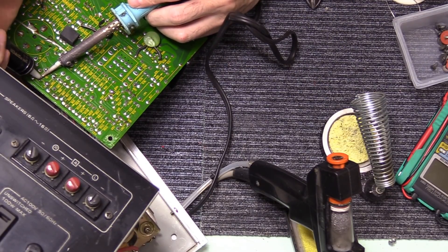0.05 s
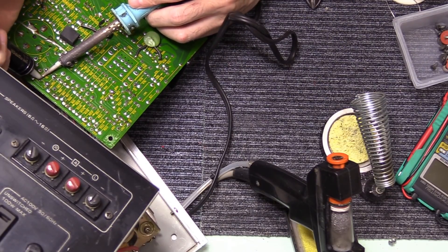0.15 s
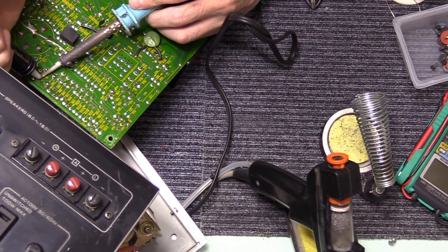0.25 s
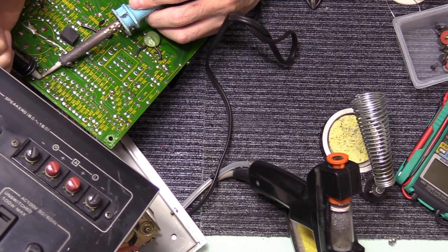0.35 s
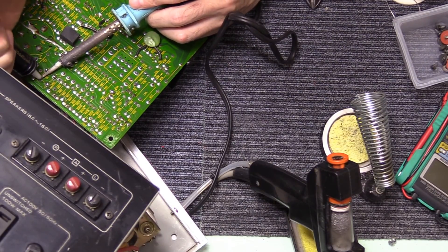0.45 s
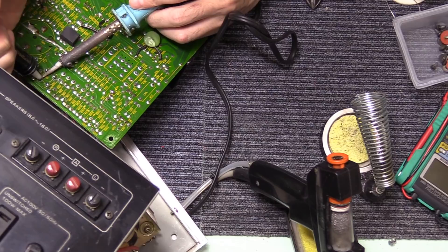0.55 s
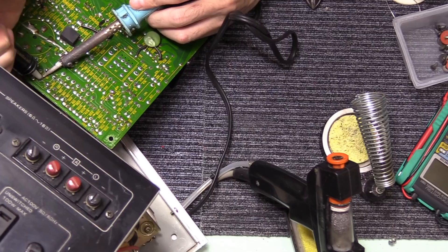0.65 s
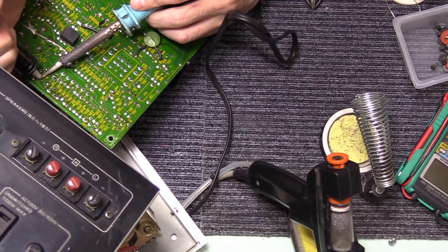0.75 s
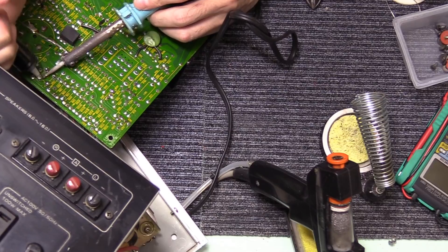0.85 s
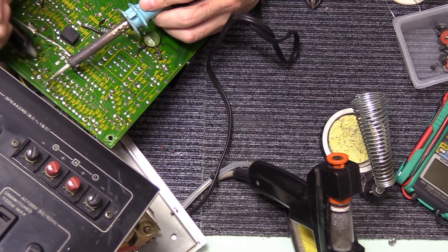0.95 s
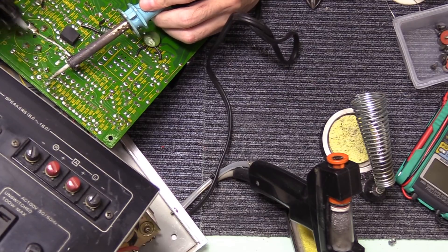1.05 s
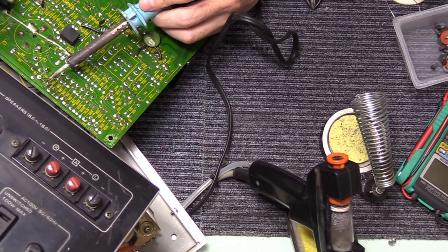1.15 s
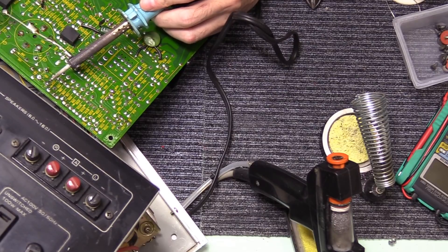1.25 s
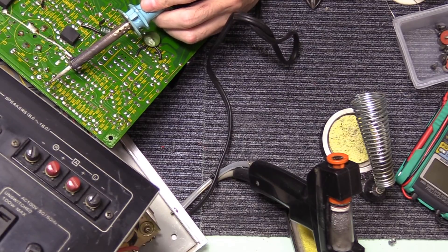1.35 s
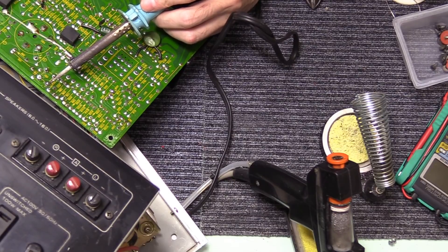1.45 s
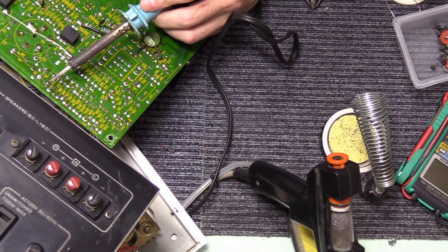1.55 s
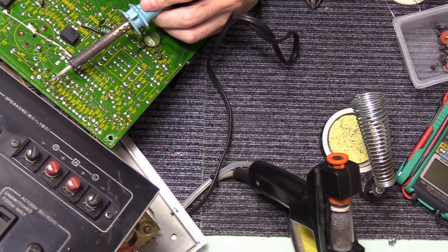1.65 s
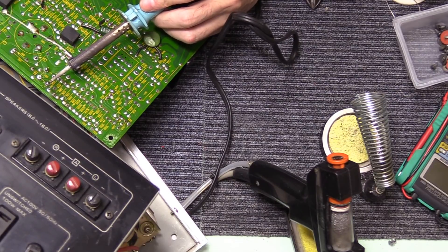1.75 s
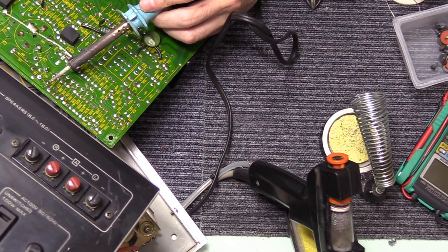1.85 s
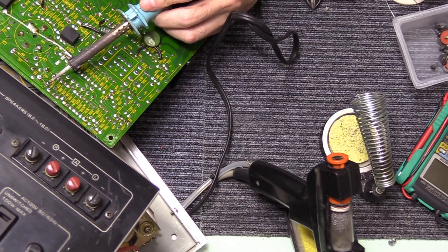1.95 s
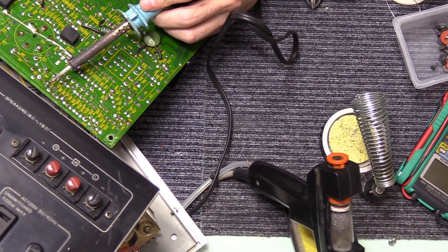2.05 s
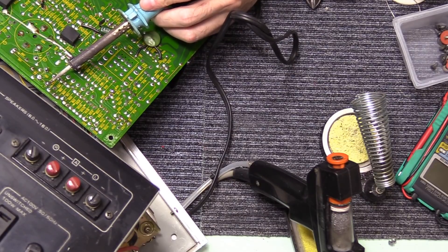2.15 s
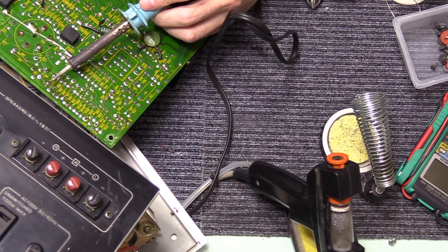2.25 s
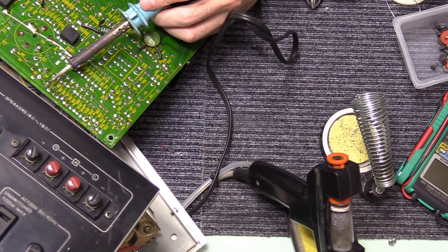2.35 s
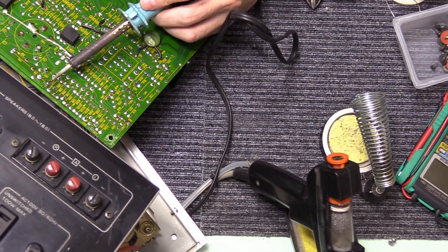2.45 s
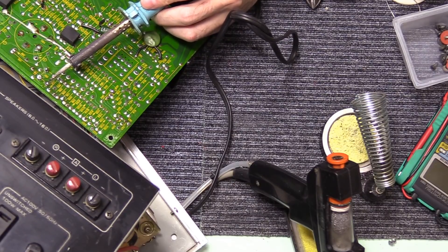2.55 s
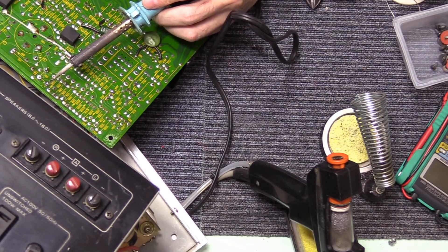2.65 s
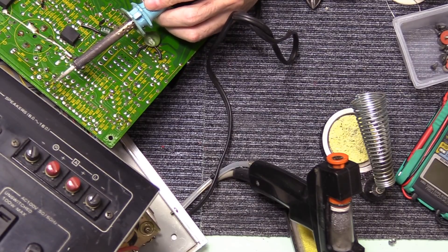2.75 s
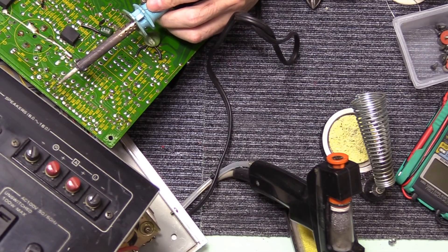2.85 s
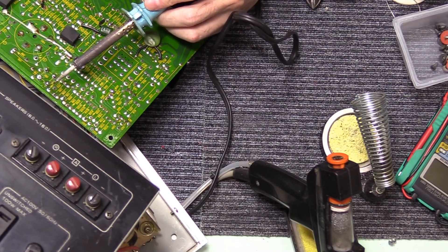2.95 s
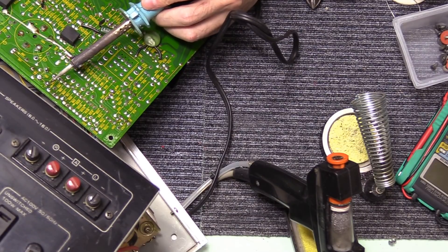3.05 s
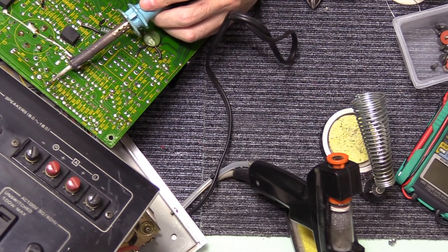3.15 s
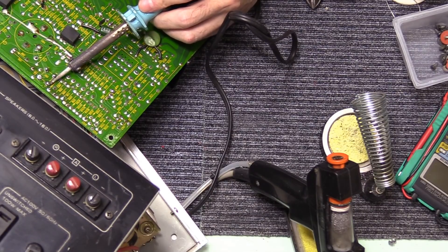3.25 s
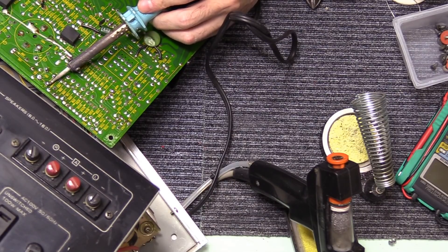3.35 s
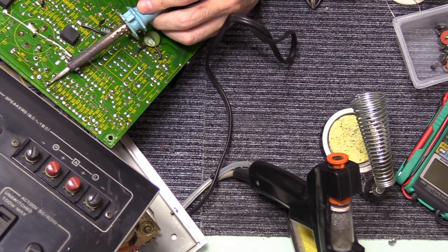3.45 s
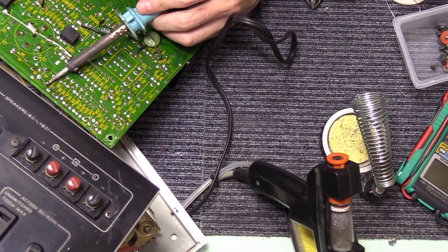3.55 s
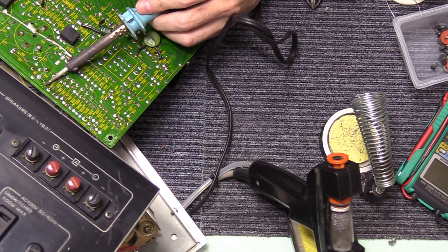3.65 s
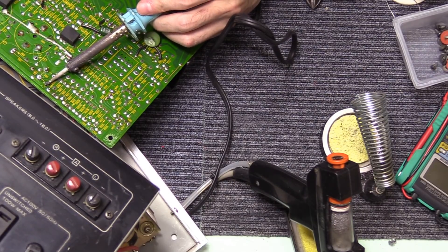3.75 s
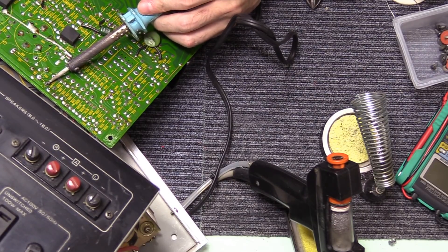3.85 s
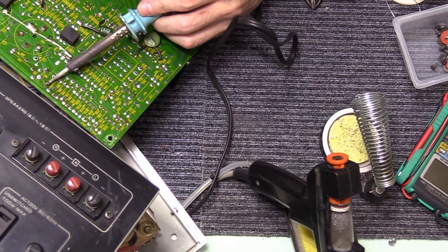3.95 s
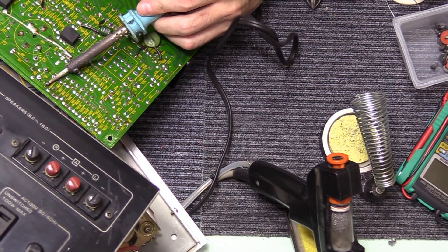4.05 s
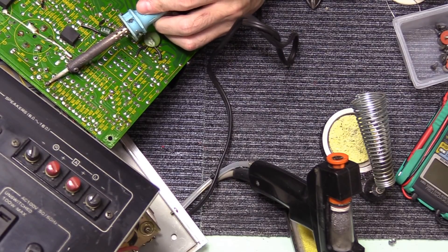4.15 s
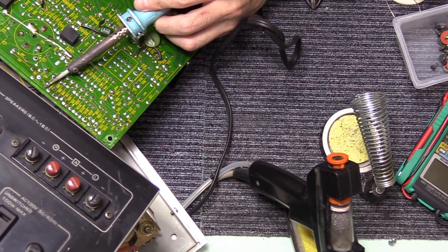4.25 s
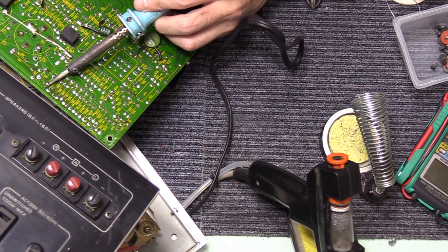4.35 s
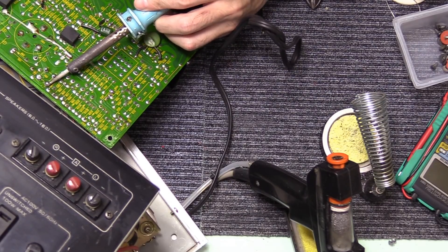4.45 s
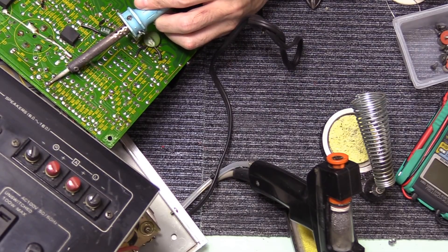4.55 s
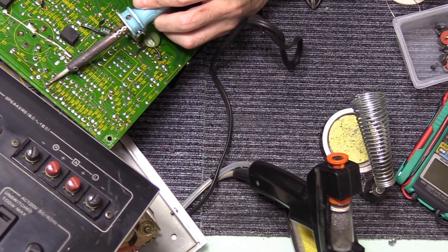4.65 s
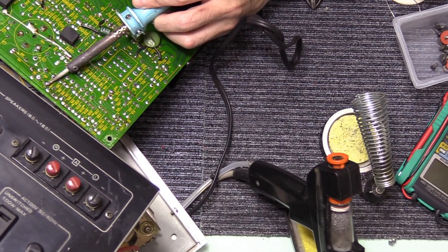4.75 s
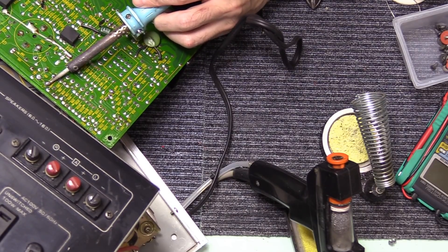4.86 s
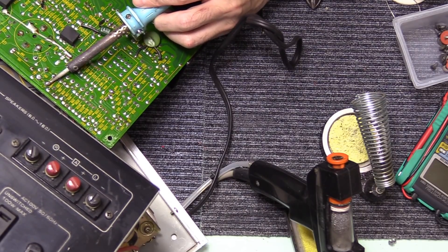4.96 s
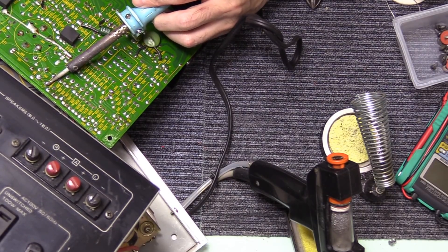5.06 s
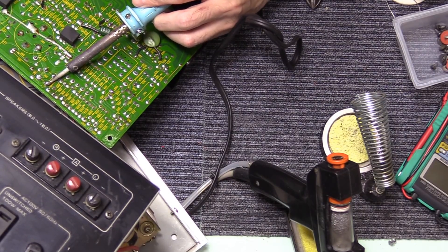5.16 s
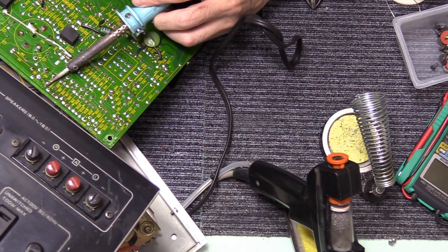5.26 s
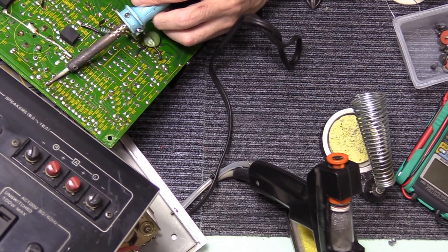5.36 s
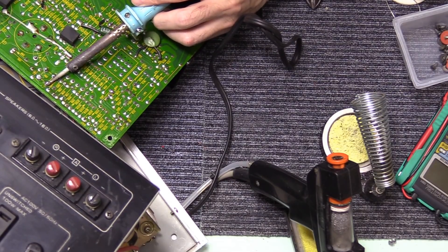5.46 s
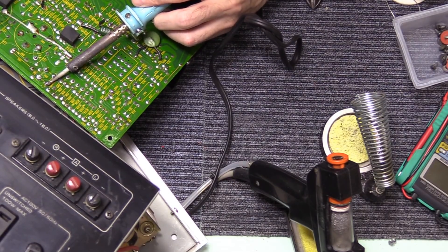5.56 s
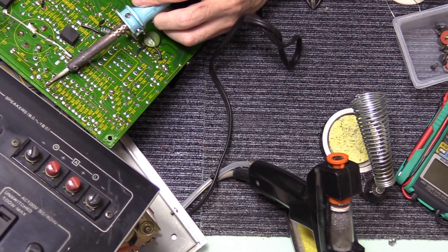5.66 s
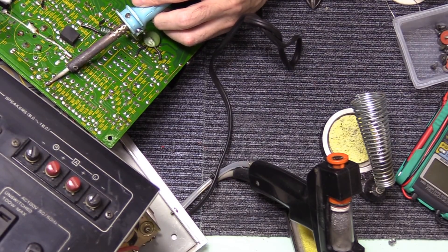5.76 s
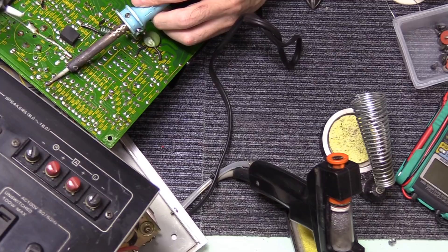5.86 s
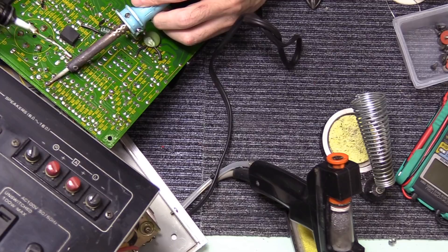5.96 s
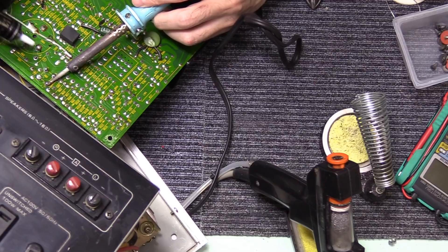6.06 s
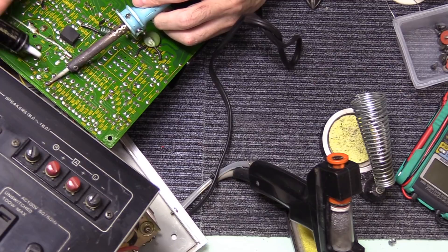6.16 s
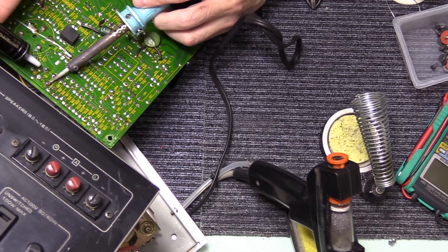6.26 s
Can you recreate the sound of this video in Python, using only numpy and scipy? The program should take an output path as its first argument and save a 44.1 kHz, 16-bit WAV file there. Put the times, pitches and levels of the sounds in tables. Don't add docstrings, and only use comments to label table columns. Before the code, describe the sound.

Quiet fan air and low electrical hum run throughout. Early on, a spring plunger snaps loose, slams on its stop and rattles in its hollow barrel, making the bench thump. Less than two seconds later, a breathy sliding hiss ends in a bright metallic click and a weaker knob click. Sparse ticks and faint rubs continue, with a light board tap near the end. Close stereo microphone, short dull room echo.

```python
import sys
import numpy as np
from scipy import signal
from scipy.fft import rfft, irfft
from scipy.io import wavfile
from scipy.ndimage import uniform_filter1d

SR = 44100
rng = np.random.default_rng(int(sys.argv[2]) if len(sys.argv) > 2 else 0)


def to_wav(sig):
    pcm = np.clip(np.atleast_2d(sig), -1, 1) * 32767
    pcm = np.round(pcm).astype(np.int16)
    wavfile.write(sys.argv[1], SR, pcm.T)


def rack_gain(trim_db):
    fader = np.asarray(trim_db, float)
    return 10 ** (fader / 20)


N = 278737


def span(seconds):
    return np.arange(int(seconds * SR)) / SR


def sine(hz, t):
    return np.sin(2 * np.pi * hz * t)


def fade(t, t60_s):
    return np.exp(-np.log(1000) * t / t60_s)


def unit(x):
    return x / np.sqrt(np.mean(x ** 2))


def band(x, hz, width_hz, order=1):
    low_hz = np.sqrt(hz ** 2 + width_hz ** 2 / 4) - width_hz / 2
    high_hz = min(low_hz + width_hz, SR / 2.2)
    sos = signal.butter(order, [low_hz, high_hz], "bandpass", fs=SR, output="sos")
    return signal.sosfilt(sos, x)


def add(out, start_s, x, pan_db=0):
    i = int(start_s * SR)
    x = x[:N - i]
    out[:, i:i + len(x)] += x * rack_gain(np.array([[pan_db], [-pan_db]]) / 2)


def colour(table):
    hz, db = np.transpose(table)
    bin_hz = np.fft.rfftfreq(N, 1 / SR)
    return rack_gain(np.interp(np.log(bin_hz + 1), np.log(hz), db))


def rattle(contact_ms):
    t = span(.05)
    return rng.standard_normal(len(t)) * np.exp(-1000 * t / contact_ms) / 2


def cluster_ring(hz, t60_s, cluster, t):
    spread = .035 * np.sqrt(hz / 5000)
    beat = sum(np.sin(2 * np.pi * hz * (1 + spread * off) * t + np.pi * turn) for off, turn in cluster)
    return beat / np.abs(beat[:SR // 200]).max() * fade(t, t60_s)


def blows(out, table, modes):
    t = span(.25)
    for start_s, ring_db, crack_db, crack_hz, contact_ms, pan_db in table:
        push = rattle(contact_ms)
        onset = np.minimum(2000 * t / contact_ms, 1)
        chance = rng.uniform(-0.93, 1, (len(modes), 5, 2))
        for (hz, db, t60_s), cluster in zip(modes, chance):
            ring = cluster_ring(hz, t60_s, cluster, t) * onset
            add(out, start_s, rack_gain(ring_db + db + 4) * ring, pan_db + 3 * cluster[0, 0])
        crack = 2 * band(push, crack_hz, 1.1 * crack_hz)
        add(out, start_s, rack_gain(crack_db) * crack, pan_db)


# (frequency [Hz], density [dB per Hz])
AIR_COLOUR = [(15, -40.5), (30, -26.5), (65, -25), (90, -12.5), (120, -6), (160, -15), (200, -9), (350, -7),
              (430, -13), (900, -16.5), (1300, -21.5), (2000, -27.5), (6000, -33), (15600, -41)]
# (frequency [Hz], side minus mid [dB])
AIR_SIDE = [(60, -17.5), (110, -9), (200, -14.5), (380, -11.5), (700, -6), (1290, -3.5), (2380, -3.5),
            (4400, -7), (8120, -6.5), (15000, -4)]
# (frequency [Hz], level [dB], waver width [Hz], waver level [dB])
HUM_LINES = [(99.488, -64, 2, -74.5), (118.62, -67.5, 5.9, -66), (200, -66, 5.1, -66.5),
             (382.63, -63, 2.2, -68.5), (895.52, -76.5, 20, -72), (2331.4, -83.5, 30, -79.5)]


def air():
    mid, side = rfft(rng.standard_normal((2, N))) * colour(AIR_COLOUR)
    mid, side = irfft(mid, N), irfft(side * colour(AIR_SIDE), N)
    swell = rack_gain(.5 * unit(uniform_filter1d(rng.standard_normal(N), size=8192)))
    air_db = -52.5
    bed = rack_gain(air_db - 2.5) * swell * np.array([mid + side, mid - side]) / np.std(mid)
    t = np.arange(N) / SR
    for hz, db, width_hz, waver_db in HUM_LINES:
        waver = unit(band(rng.standard_normal(N), hz, width_hz))
        bed += rack_gain(db + 2.5) * sine(hz, t) + rack_gain(waver_db) * waver
    shaft_hz, shaft_db, throb_s, throb_top_s = 48.9, -66.5, 2.56, 2.4
    throb = np.cos(np.pi * (t - throb_top_s) / throb_s)
    return bed + rack_gain(shaft_db) * throb * sine(shaft_hz, t)


# (time [s], ring peak [dB], ring frequency [Hz], low [dB], middle [dB], high [dB])
TOOL_TICKS = [(0.129, -54, 869.7, -52.5, -51, -52.5), (0.411, -46, 716.2, -51, -53.5, -63.5),
              (0.545, -46.5, 847.8, -43, -46.5, -52), (0.816, -46, 617.1, -47, -45.5, -43.5),
              (1.314, -34.5, 3499, -59.5, -54, -56), (1.49, -32.5, 2892, -59, -54.5, -48.5),
              (1.529, -50, 603.8, -54.5, -61.5, -45.5), (1.551, -36, 9051, -56.5, -61, -44),
              (1.586, -41.5, 1298, -50.5, -61, -63), (1.769, -54.5, 880.8, -54.5, -53, -62),
              (2.062, -47, 612.3, -57.5, -50, -46), (2.089, -49, 778, -60.5, -52.5, -72.5),
              (2.499, -51, 594.3, -59, -56.5, -63), (2.52, -53.5, 690.4, -59.5, -51, -50),
              (2.673, -57.5, 840, -58, -51.5, -54.5), (2.747, -47.5, 887, -68, -53, -46.5),
              (3.308, -32, 665.5, -44, -45, -56), (3.71, -50, 940, -59, -56, -54.5),
              (3.742, -55, 770, -54, -64, -47.5), (3.769, -55.5, 894, -58, -68, -54),
              (3.799, -54.5, 901.8, -59, -61, -61), (3.954, -46.5, 770, -56, -60, -69.5),
              (4.263, -49, 891, -50.5, -49, -49.5), (4.308, -40.5, 643, -54, -61, -67),
              (4.524, -54.5, 775, -59, -58, -68.5), (4.61, -42, 770, -51, -51, -55),
              (4.688, -32.5, 1062, -47.5, -44.5, -49), (4.705, -43, 1160, -58, -50, -70.5),
              (4.919, -58.5, 627, -56, -65.5, -69.5), (5.881, -45, 711, -66, -58, -51.5),
              (6.0, -45, 715.9, -58.5, -57, -66), (6.089, -52.5, 794, -46, -45, -45.5),
              (6.147, -52, 652, -54, -51.5, -73), (6.192, -50, 939, -48.5, -51.5, -62)]


def ticks(out):
    for start_s, ring_db, ring_hz, low_db, middle_db, high_db in TOOL_TICKS:
        push = rattle(4.0)
        for hz, width_hz, part_db in ((1100, 1800, low_db), (3500, 5200, middle_db), (9700, 7500, high_db)):
            part = band(push, hz, width_hz, order=2)
            add(out, start_s, rack_gain(part_db + 5.5) * part / np.abs(part).max())
        ring = band(push, ring_hz, 0.077 * ring_hz)
        add(out, start_s, rack_gain(ring_db - 5.5) * ring / np.abs(ring).max())


def room(x):
    low_t60_s, top_t60_s, room_db, side_db = 0.16809, 0.14, -6.5, -9.5
    t = span(.4)
    noise = rng.standard_normal((2, len(t)))
    low = band(noise, 700, 3200)
    mid, side = low * fade(t, low_t60_s) + (noise - low) * fade(t, top_t60_s)
    side = rack_gain(side_db) * side
    echo = np.array([mid + side, mid - side]) * (t > .0025)
    return rack_gain(room_db) * signal.fftconvolve(x, echo / np.linalg.norm(mid), axes=1)[:, :N]


RELEASE_BLOWS = [
    (.6245, -19, -14, 6000, 15.05, 0.01377),
    (.6275, -21, -19.5, 4000, 4.6, 0),
]
SPRING_MODES = [(322.78, -4, 0.03634), (696, 3, 0.036), (1080.1, 1.5, 0.039), (1411.8, -15.5, 0.05446),
                (4480.1, -12.5, 0.01888), (7000, -12.5, .02)]


def release(out):
    blows(out, RELEASE_BLOWS, SPRING_MODES)


# (time [s], frequency [Hz], level [dB], rise [ms], t60 [s])
BENCH_BOOMS = [
    (.636, 118, -19, 15, .3),
    (.634, 86, -31, 12, 0.3),
    (.625, 45, -44, 10, .25),
    (.64, 175, -38, 12, 0.298),
    (.626, 210, -34, 4, .1),
    (2.8, 91, -57.5, 15, 0.3297),
    (4.26, 110, -50.5, 20, 0.374),
]


def bench(out):
    t = span(.6)
    for start_s, hz, db, rise_ms, t60_s in BENCH_BOOMS:
        rise = 1 - np.exp(-(1000 * t / rise_ms) ** 2)
        add(out, start_s, rack_gain(db) * rise * fade(t, t60_s) * sine(hz, t))


SLAM_BLOWS = [
    (.634, -12, -0.5, 8250, 1.6, -3),
]
STOP_MODES = [(324.94, -12, .03), (1397.1, -7, .025), (1851.1, 0.5, .025), (2150, -4, .02),
              (5661, -6, .012), (8332.3, -1.5, 0.016), (10723, -7, .012)]


def slam(out):
    blows(out, SLAM_BLOWS, STOP_MODES)


CLATTER_BLOWS = [
    (.637, -22, -16, 5000, 4, 0.9994),
    (.642, -21, -17, 6000, 5, 0.0034),
    (.648, -24, -18, 7000, 5, 0),
    (.655, -24, -18, 5000, 6, 0.0034),
    (.666, -30.5, -24, 5000, 5, 0),
    (.676, -36.5, -28, 5000, 5, 0),
]
BARREL_MODES = [(409.99, -10, .07), (476, -2.5, .06), (552, -3, .06), (651.59, -2.5, .07), (891, -7, 0.054),
                (1398, -6, .04), (1760, -6, .05), (1925, -8, .04), (2351, -10, .05), (2870, -12, .04),
                (4118, -12, .03), (5800, -11, .02)]


def clatter(out):
    blows(out, CLATTER_BLOWS, BARREL_MODES)


# (start [s], length [s], centre [Hz], width [Hz], level [dB])
RUBS = [(.8, 0.27244, 5755, 9010, -61), (1.17, 0.0308, 8000, 2485, -68), (1.24, 0.02927, 8500, 1200, -70),
        (1.27, 0.03337, 8208, 1200, -65), (1.36, 0.0622, 6800, 1300, -66), (1.36, 0.0552, 8700, 1200, -72),
        (1.5, 0.3105, 4000, 4000, -65.5), (1.85, 0.055, 7700, 1500, -68),
        (2.05, 0.14687, 5887, 6000, -62.5), (2.179, 0.1943, 6480, 3013, -56),
        (2.198, 0.0596, 7000, 1000, -60), (2.22, 0.0798, 4767, 900, -63),
        (2.25, 0.11184, 8400, 1475, -54.5), (2.29, 0.10666, 6800, 1200, -59),
        (2.2, .16, 11610, 1500, -61.5), (2.27, 0.2629, 8500, 7000, -62.5),
        (2.3, 0.09827, 2128, 1500, -58.5), (2.95, 0.16, 6520, 900, -71), (3.13, .05, 7970, 1500, -73),
        (3.22, 0.11, 3738, 160, -65.5), (3.22, 0.0503, 2150, 160, -66), (3.23, 0.036, 7000, 4000, -66.5),
        (3.37, 0.043, 2150, 200, -66), (3.65, 0.048, 4260, 900, -65), (3.74, 0.01881, 4371, 300, -61.5),
        (3.8, 0.0295, 4364, 300, -67.5), (3.86, 0.02373, 4193, 700, -67), (3.93, .03, 4200, 900, -67.5),
        (4.44, 0.037, 6300, 600, -72), (5.03, 0.2035, 7300, 2510, -67), (5.04, .14, 13500, 3000, -66),
        (5.16, 0.095, 4300, 604, -69), (5.789, 0.2371, 4554, 200, -70.5), (4.27, 0.07068, 600, 900, -59.5),
        (5.98, 0.0412, 4300, 1200, -65), (6.2, 0.0998, 2108, 200, -64)]


def brushes(out):
    for start_s, length_s, hz, width_hz, db in RUBS:
        t = span(length_s)
        drift = uniform_filter1d(rng.standard_normal(SR // 2), size=256)[:len(t)]
        grain = rack_gain(1.6 * drift * 15)
        rub = unit(band(rng.standard_normal(SR // 2), hz, width_hz, order=2))[:len(t)]
        add(out, start_s, rack_gain(db) * rub * grain * np.sin(np.pi * t / length_s) ** .8)


LATCH_BLOWS = [
    (2.3977, -25, -9.5, 8000, 0.72, 0.00068),
    (2.404, -34, -25, 5000, 2.9, 0.00045),
    (2.414, -35.5, -32.5, 6000, 3, 0.00016),
]
CATCH_MODES = [(1844.2, -2, 0.02417), (2161.3, -2, 0.03195), (2377.3, -3.5, 0.02579), (3157, -13.5, 0.0749),
               (3353.9, -1.5, 0.05571), (4705.4, -9.5, 0.0373), (6893.3, 1, 0.02153),
               (7850.5, -4.5, 0.0213), (9909, -6, 0.01267)]


def latch(out):
    blows(out, LATCH_BLOWS, CATCH_MODES)


LET_GO_BLOWS = [
    (2.556, -47.5, -30, 4000, 3.8, 0.00012),
    (2.5617, -34, -24, 8500, 0.95, 0.00016),
    (2.567, -51.5, -37.5, 7983, 4.345, 0),
]
KNOB_MODES = [(698.7, 2.5, 0.04166), (2567.9, -3.5, 0.04217), (3883, -3, 0.02252), (4694, -4, 0.0267),
              (6179, -9, 0.02034), (7879, -3.5, 0.0174), (8700, -5.5, 0.0235)]


def let_go(out):
    blows(out, LET_GO_BLOWS, KNOB_MODES)


TAP_BLOWS = [
    (5.758, -34.5, -34, 3500, 1.5, 0.00103),
    (5.762, -38.5, -23.5, 4630, 2.437, 0.000085),
    (5.77, -50.5, -30.5, 4000, 5.214, 0),
]
BOARD_MODES = [(1021.6, -7.5, 0.04776), (1347, -7, 0.03569), (1832.5, -4, 0.04216), (2027.7, -4.5, 0.04846),
               (2574.6, -4, 0.03251), (3157.1, 2.5, 0.05012), (3500, -4.5, 0.04203), (4000, -7, 0.02992),
               (4727.2, -7.5, 0.05174), (5900, -1, 0.02752)]


def tap(out):
    blows(out, TAP_BLOWS, BOARD_MODES)


def scene():
    background = air()
    near = np.zeros((2, N))
    for play in (ticks, release, slam, clatter, brushes, latch, let_go, tap):
        play(near)
    near = signal.sosfilt(signal.butter(2, 11500, fs=SR, output="sos"), near)
    wet = room(near)
    bench(near)
    return near + wet + background


def top_cut(x):
    return signal.sosfilt(signal.butter(12, 15780, fs=SR, output="sos"), x)


def record(dry):
    mix = np.tanh(0.89355 * dry) / 0.88601
    return top_cut(mix)


dry = scene()
out = record(dry)
to_wav(out)
```